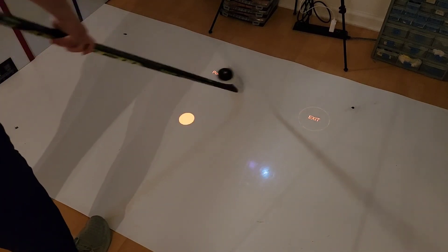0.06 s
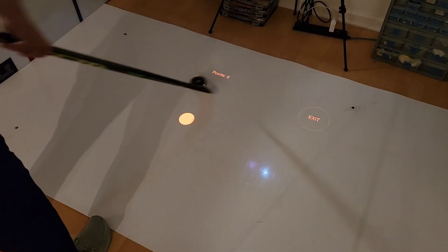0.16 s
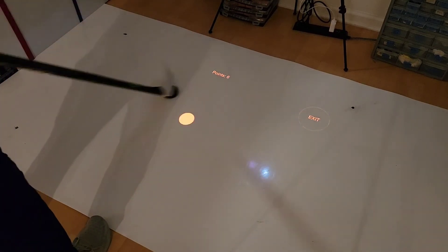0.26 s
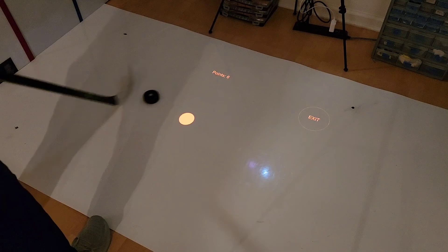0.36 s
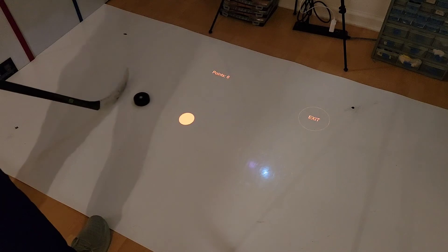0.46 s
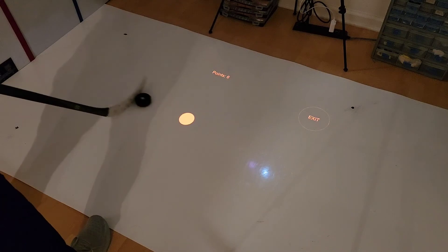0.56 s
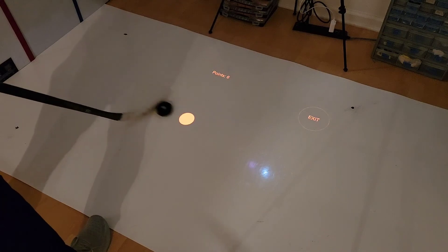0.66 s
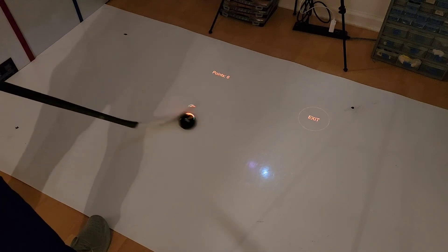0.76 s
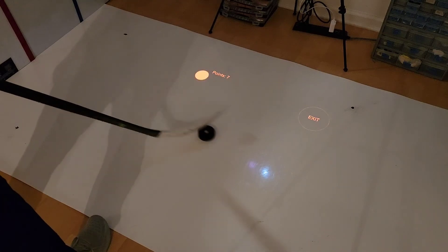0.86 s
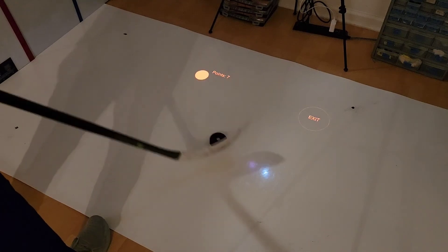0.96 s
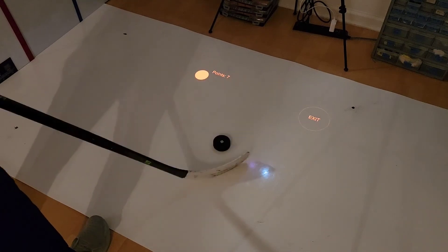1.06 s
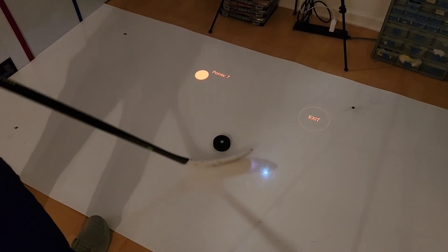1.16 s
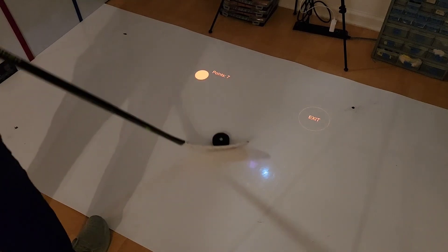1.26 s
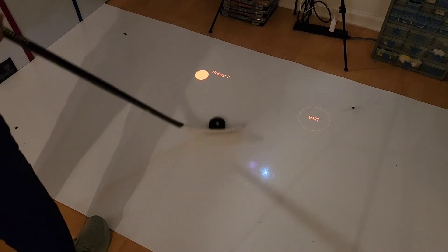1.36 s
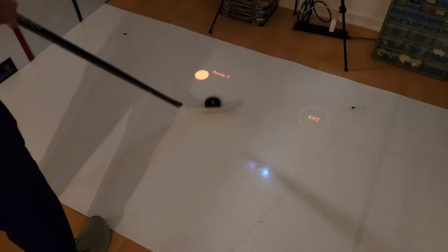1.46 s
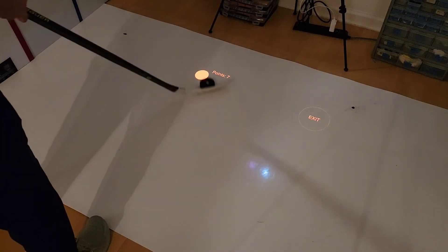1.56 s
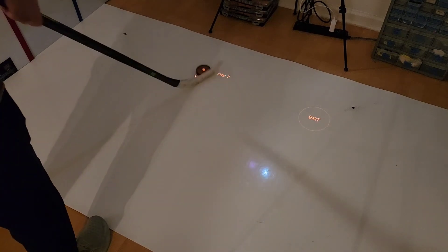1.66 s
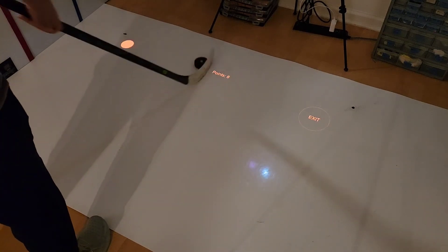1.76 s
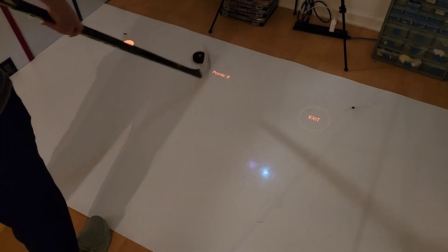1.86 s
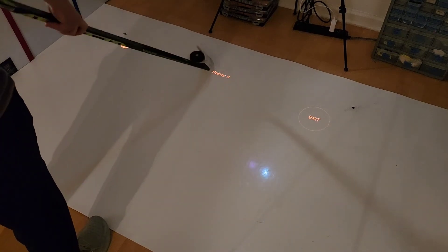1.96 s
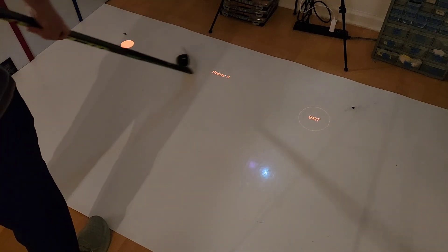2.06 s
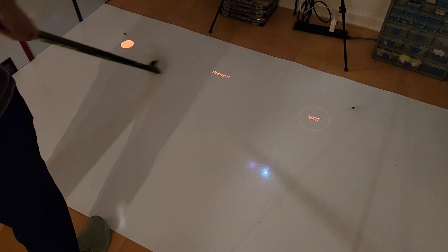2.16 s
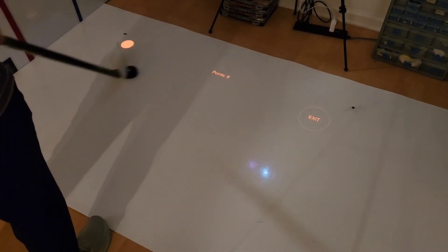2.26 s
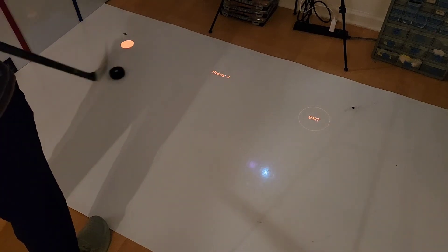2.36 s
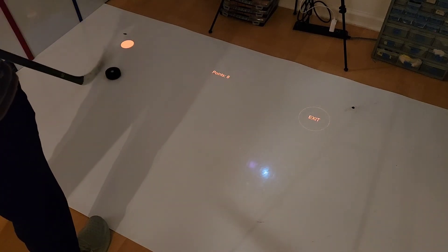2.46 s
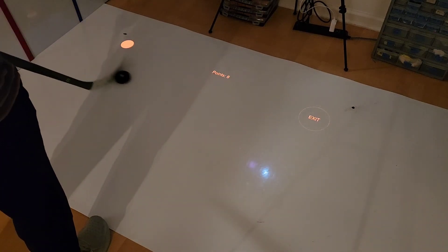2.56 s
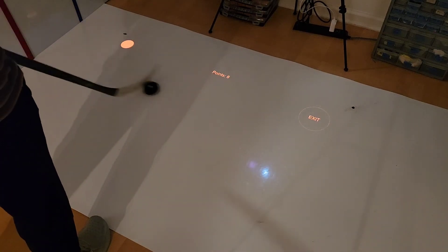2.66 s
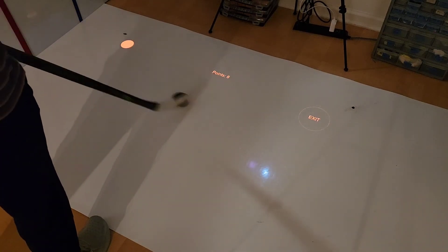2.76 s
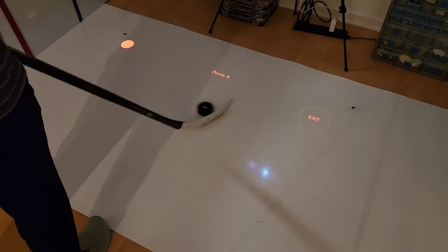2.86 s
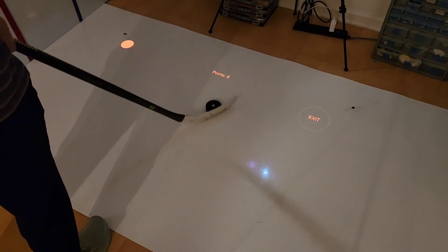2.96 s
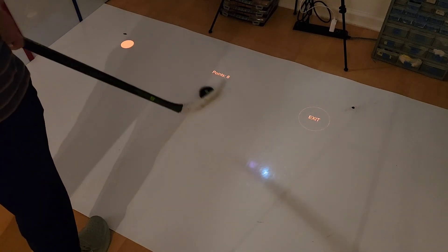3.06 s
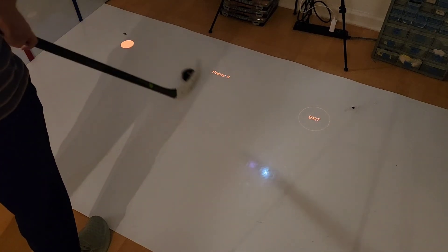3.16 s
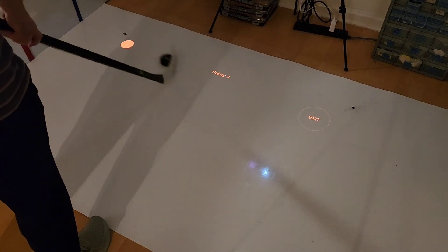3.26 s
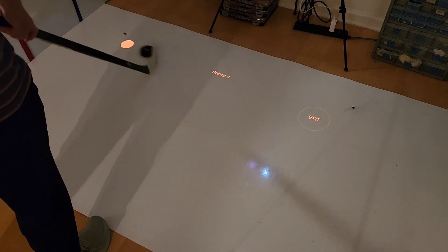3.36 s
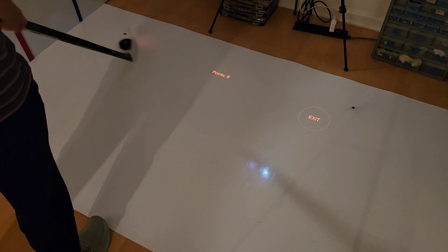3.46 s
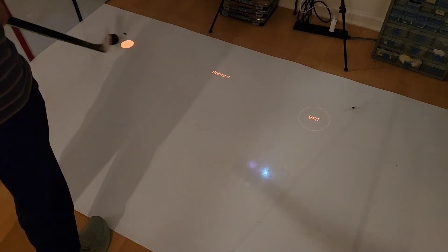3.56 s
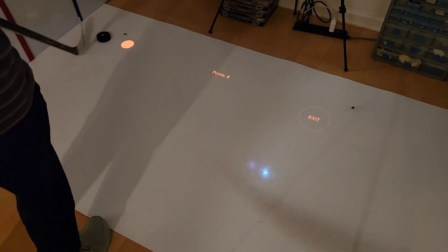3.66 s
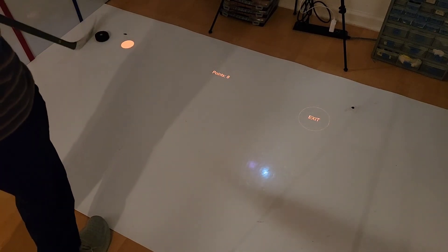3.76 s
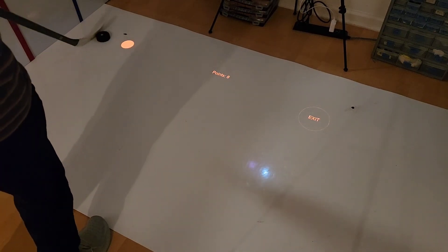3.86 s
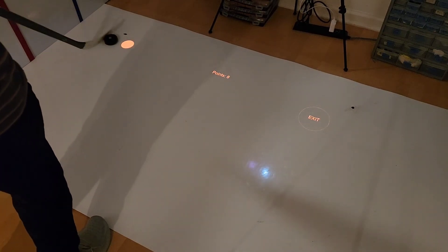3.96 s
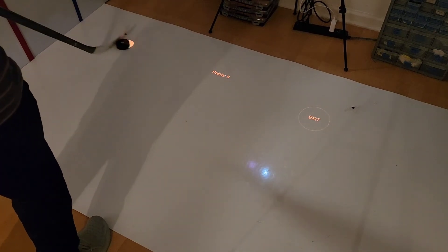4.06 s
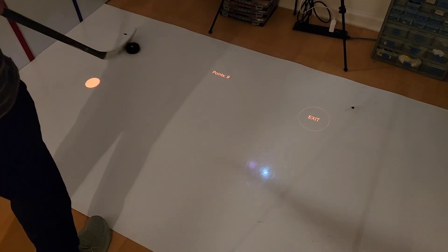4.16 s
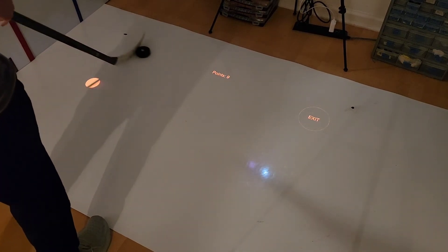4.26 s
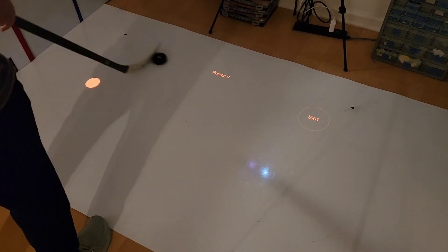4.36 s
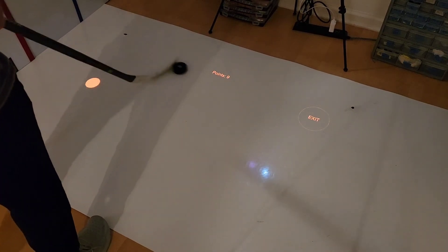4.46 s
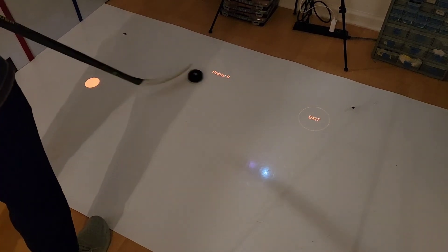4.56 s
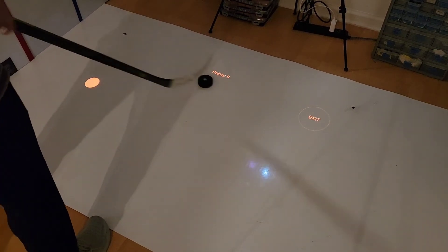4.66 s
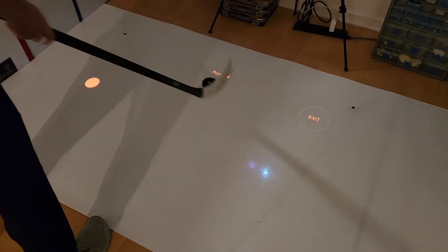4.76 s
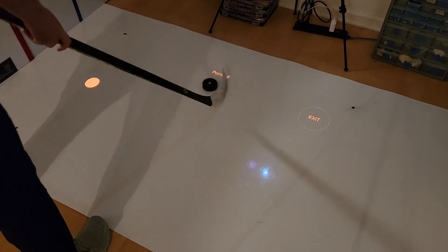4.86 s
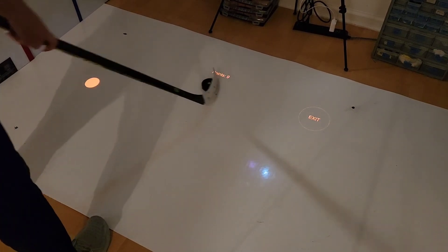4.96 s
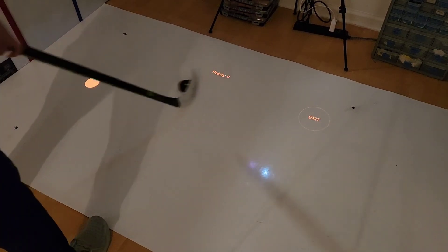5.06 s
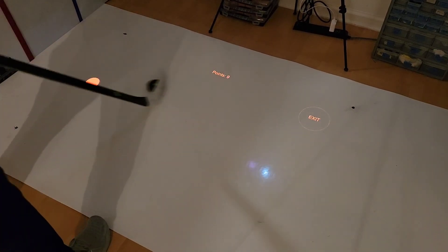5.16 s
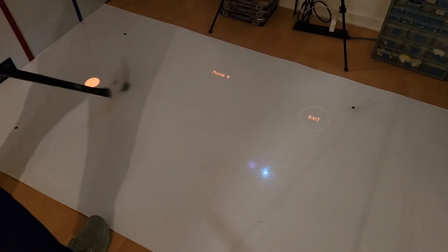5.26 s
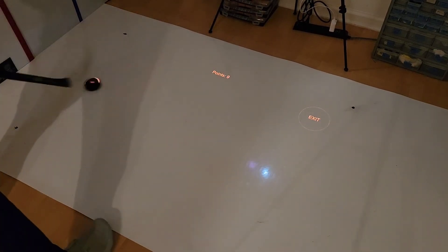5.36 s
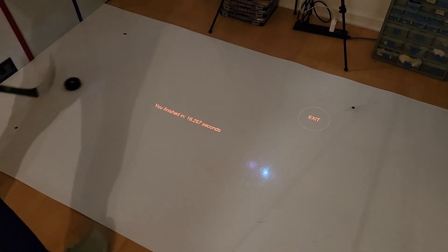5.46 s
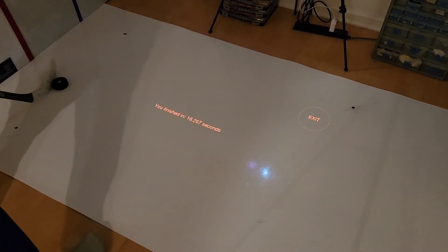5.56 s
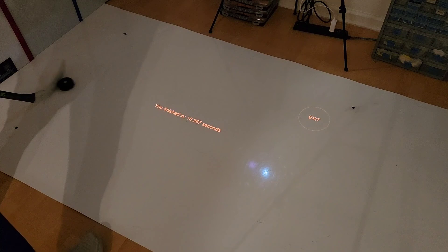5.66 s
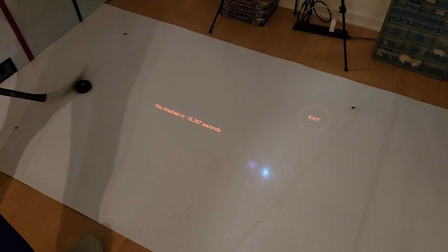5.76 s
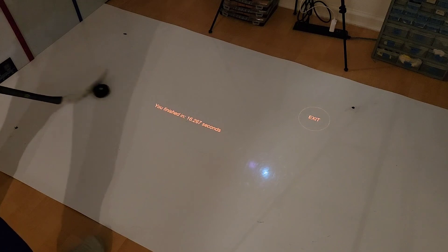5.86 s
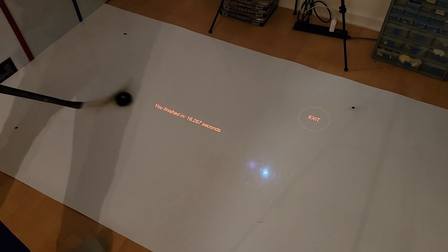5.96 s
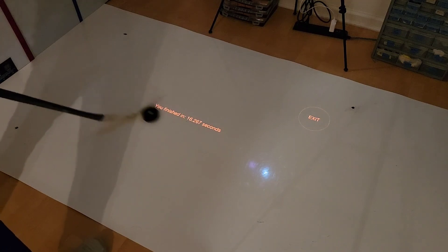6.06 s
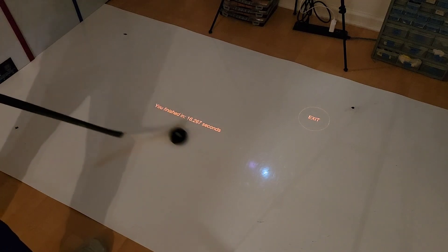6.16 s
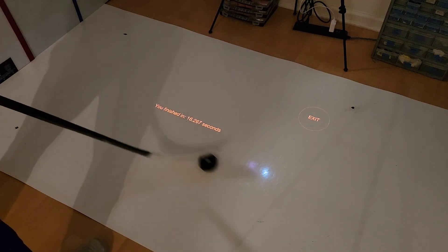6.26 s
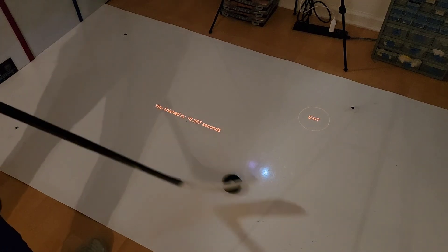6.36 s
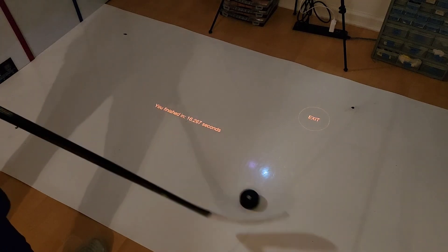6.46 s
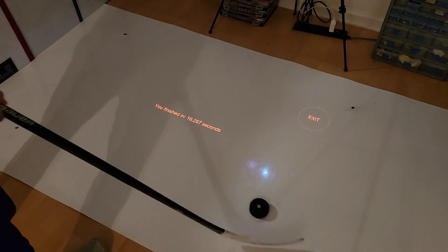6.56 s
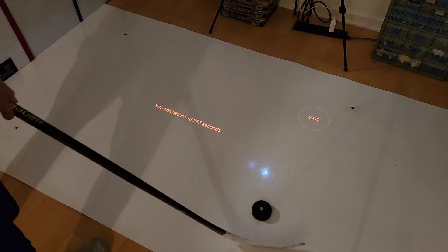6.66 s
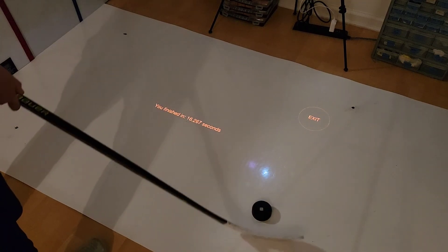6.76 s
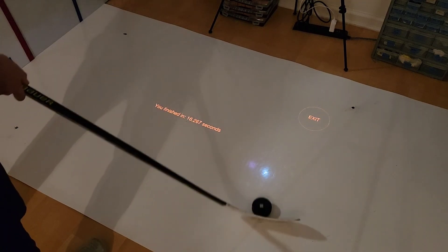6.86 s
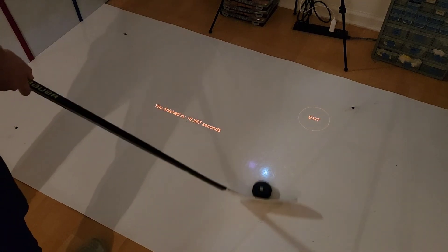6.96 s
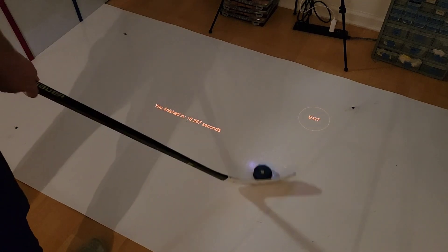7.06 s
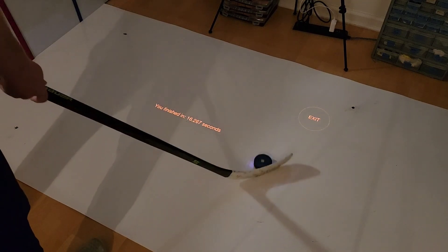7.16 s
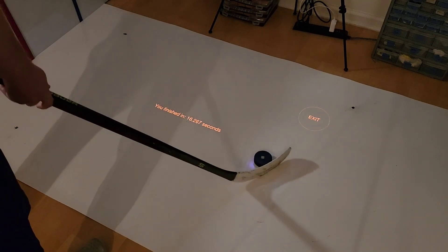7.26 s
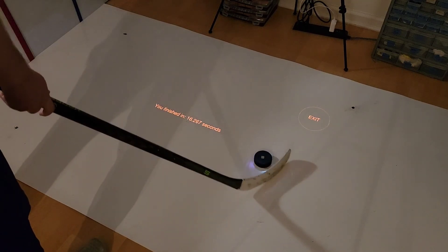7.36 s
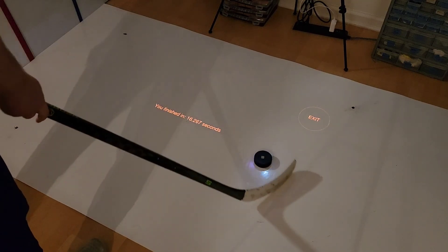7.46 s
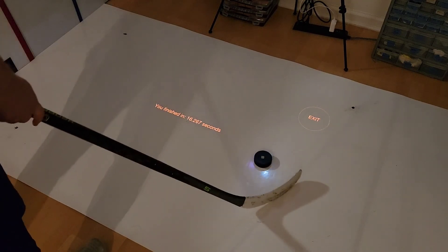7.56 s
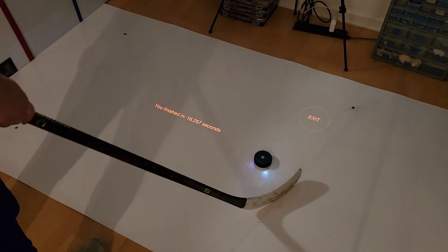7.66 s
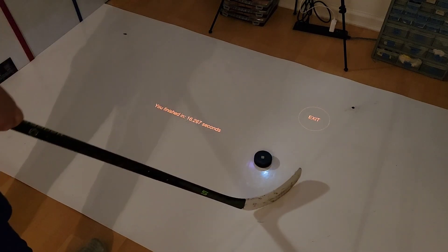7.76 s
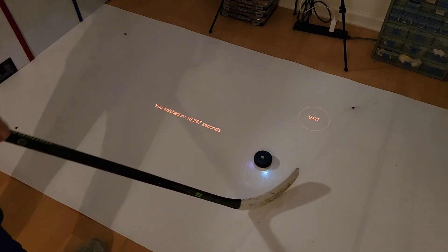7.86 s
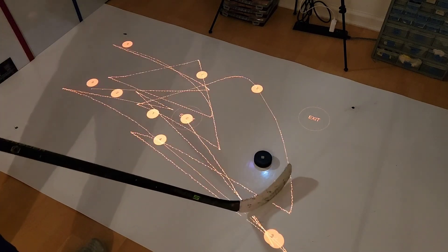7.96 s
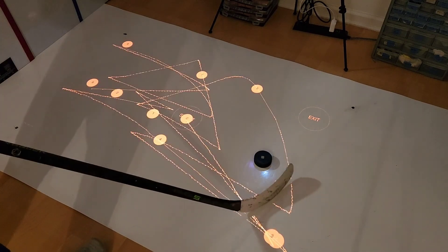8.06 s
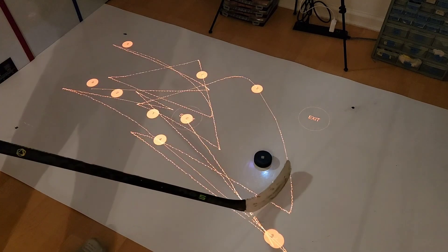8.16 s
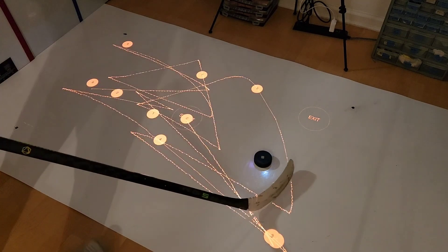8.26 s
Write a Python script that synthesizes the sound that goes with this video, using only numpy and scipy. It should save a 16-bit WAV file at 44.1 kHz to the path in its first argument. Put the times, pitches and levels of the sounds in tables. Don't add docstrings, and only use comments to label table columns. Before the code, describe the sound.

Stickhandling practice in a bare room: irregular woody clacks of stick on ball, faint scrapes, dull board thumps, and low ventilation rumble.

```python
import sys
import numpy as np
from scipy import signal
from scipy.fft import rfft, irfft
from scipy.io import wavfile

SR = 44100
rng = np.random.default_rng(int(sys.argv[2]) if len(sys.argv) > 2 else 0)


def field_ratio(decibels):
    return 10 ** (np.asarray(decibels, dtype=float) / 20)


def to_wav(sig):
    pcm = np.clip(np.atleast_2d(sig), -1, 1) * 32767
    pcm = np.round(pcm).astype(np.int16)
    wavfile.write(sys.argv[1], SR, pcm.T)


N = 366912
EDGES = 20 * 2 ** np.arange(0, 9.9, 1 / 3)
TAIL = 24000
COARSE = np.arange(0, N + 40, 40)


def at_hz(points, hz):
    table_hz, table_db = np.array(points).T
    return np.interp(np.log(hz), np.log(table_hz), table_db)


def rms_one(x):
    return x / np.sqrt(np.mean(x ** 2) + 1e-20)


def add(out, s, sound):
    at = round(s * SR)
    out[:, at:at + sound.shape[1]] += sound[:, :N - at]


def drift(rate_hz):
    pole = np.exp(-80 * np.pi * rate_hz / SR)
    settle = 2000
    noise = rng.standard_normal(len(COARSE) + settle)
    return rms_one(signal.lfilter([1], [1, -2 * pole, pole * pole], noise)[settle:])


def gestures(start_s, end_s, level_db, rest_db, rise_db_s, fall_db_s):
    t = COARSE[:, None] / SR
    rise_db = rise_db_s * np.maximum(start_s - t, 0)
    fall_db = fall_db_s * np.maximum(t - end_s, 0)
    power = field_ratio(2 * rest_db) + np.sum(field_ratio(2 * (level_db - rise_db - fall_db)), axis=1)
    return 10 * np.log10(power)


def diffuse_bands():
    # (frequency [Hz], left-right likeness [-1 to 1])
    likeness = [(60, 0.98), (130, 0.92), (290, 0.89), (640, 0.4), (1410, 0.32), (3100, 0.14), (6820, -0.13),
                (15000, 0.11)]
    hz = np.maximum(np.arange(N // 2 + 1) * SR / N, 1)
    alike = np.clip(at_hz(likeness, hz), 0, 1)
    mid, side = rfft(rng.standard_normal((2, N)))
    pair = np.sqrt(1 + alike) * mid + np.sqrt(1 - alike) * side * np.array([[1], [-1]])
    place = np.log(hz / EDGES[0]) / np.log(EDGES[1] / EDGES[0])
    bands = []
    for k in range(len(EDGES)):
        window = np.cos(np.pi / 2 * np.clip(place - k, -1, 1))
        bands.append(irfft(pair * window, N))
    return np.array(bands)


def coloured(bands, spectrum, level_db, patchy_db):
    out, plain_power = np.zeros((2, N)), 0
    for hz, band in zip(EDGES, bands):
        if spectrum[0][0] <= hz <= spectrum[-1][0]:
            band_db = at_hz(spectrum, hz)
            gain_db = level_db + band_db + patchy_db * drift(7.3)
            out += np.interp(np.arange(N), COARSE, field_ratio(gain_db)) * band
            plain_power += field_ratio(2 * band_db) * np.var(band[0, ::7])
    return out / np.sqrt(plain_power)


def ring(modes, gains_db, length):
    t = np.arange(length) / SR
    hz, mode_db, t60_s = np.transpose(modes)[:, :, None]
    signs = (-1.) ** np.arange(len(modes))[:, None]
    envelope = field_ratio(mode_db + gains_db[:, None] - 60 * t / t60_s)
    return np.sum(signs * envelope * np.sin(2 * np.pi * hz * t), axis=0)


def room_decay():
    # (frequency [Hz], T60 [s])
    room_t60 = [(60, 1), (160, 0.55), (420, 0.37), (1100, 0.56), (2900, 0.66), (7700, 0.53), (14000, 0.74)]
    # (frequency [Hz], level [dB])
    room_colour = [(60, 3), (250, 3), (700, 2.5), (1500, -2.5), (3000, -1.5), (6000, 1), (12000, 2)]
    gap_s, early_s = 0.0026, 0.07
    t = np.arange(TAIL) / SR
    dying = field_ratio(at_hz(room_colour, EDGES)[:, None] - 60 * t / at_hz(room_t60, EDGES)[:, None])
    onset = np.clip(t / gap_s - .3, 0, 1)
    return dying * onset * (1 + 1.1 * np.exp(-t / early_s))


def heard(bands, decay, sound, wet_db):
    # (delay [s], level [dB])
    echoes = [(.0045, -11), (.0085, -12), (.0115, -9), (.017, -13), (.024, -13)]
    start = rng.integers(0, N - TAIL)
    grain = bands[:, :, start:start + TAIL]
    room = field_ratio(wet_db - 41) * np.einsum("bct,bt->ct", grain, decay)
    for (delay_s, echo_db), (shift, side) in zip(echoes, rng.normal(0, 1, (len(echoes), 2))):
        at = round((delay_s + .0008 * shift) * SR)
        room[[0, 1], [at, at + round(9 * side)]] += field_ratio(echo_db + wet_db)
    room[[0, 1], [0, 3]] += 1
    return signal.fftconvolve(room, sound[None], axes=1)


def rumble(bands):
    # (frequency [Hz], density [dB per Hz])
    rumble_colour = [(12, -40), (20, 6.5), (33, -13), (53, 12.5), (76, 3.5), (129, -11), (145, -56.5),
                     (160, -57), (210, -89), (350, -120)]
    # (start [s], end [s])
    swells = [(0.0, .5), (1.3, 1.42), (2.35, 2.6), (6.3, 7.5), (7.75, 7.85), (8.25, 8.32)]
    swell_db = [-52.5, -57.5, -52.5, -57.5, -64.5, -51]
    level_db = gestures(*np.transpose(swells), np.array(swell_db), rest_db=-57, rise_db_s=40, fall_db_s=30)
    return coloured(bands, rumble_colour, level_db, patchy_db=3.5)


def room_tone(bands):
    # (frequency [Hz], density [dB per Hz])
    air = [(100, -1), (130, -5.5), (400, -7.5), (800, -14), (1800, -24), (4000, -36), (6500, -51),
           (16500, -50)]
    return coloured(bands, air, level_db=-58, patchy_db=2.66)


def sliding(bands):
    # (start [s], end [s])
    strokes = [(0.1, .22), (.25, .85), (1.14, 1.78), (2.09, 2.39), (2.46, 3.46), (3.52, 3.8), (4.0, 4.12),
               (4.15, 4.4), (4.42, 4.58), (4.95, 5.5), (5.58, 6.2), (6.22, 6.52), (6.9, 7.22), (7.36, 7.6)]
    # (fizz level [dB], scrape level [dB])
    stroke_db = [(-63.5, -71), (-70, -71.5), (-66.5, -65), (-64.5, -63.5), (-64, -66), (-73.5, -75),
                 (-68, -62), (-68.5, -68), (-63, -62.5), (-65, -70), (-64.5, -71), (-68.5, -68),
                 (-69, -67.5), (-68.5, -65)]
    # (frequency [Hz], density [dB per Hz])
    scrape = [(800, -1.5), (1300, -13), (2000, -13), (3000, -1.9), (4500, 0), (6000, -2.5), (8000, -3.5)]
    # (frequency [Hz], density [dB per Hz])
    fizz = [(5000, -36), (6500, -12), (8000, 5), (10000, -5), (12500, -7), (14500, -4), (16500, -9)]
    start_s, end_s = np.transpose(strokes)
    stroke_fizz_db, stroke_scrape_db = np.transpose(stroke_db)
    fizz_db = gestures(start_s, end_s, stroke_fizz_db, rest_db=-81.5, rise_db_s=300, fall_db_s=110)
    scrape_db = gestures(start_s, end_s, stroke_scrape_db, rest_db=-76, rise_db_s=300, fall_db_s=110)
    return coloured(bands, scrape, scrape_db, patchy_db=2.5) + coloured(bands, fizz, fizz_db, patchy_db=3.9)


def knocks(bands, decay):
    # (time [s], direct body rms [dB]; upper body [dB], crack [dB]
    # relative to body; room share [dB])
    hits = [(0.456, -25, 3.5, -15.5, 5.5), (0.609, -21, -4, -11.5, 1.5), (1.131, -22.5, -4, -18, -1),
            (1.311, -24.5, -6, -19.5, 4), (2.337, -39.5, -10, -23, 4.5), (2.443, -39, -18, -20, 2.5),
            (2.469, -27, -9, -26, 6.5), (2.574, -21, -10, -24, 2.3), (2.923, -22, -4, -16, 2),
            (2.966, -24, 0, -8.5, 2.1), (3.741, -24.5, -3, -16, 6), (4.934, -20, 3.1, -4, 1.5),
            (5.565, -28.5, -10.5, -20.5, 6), (5.63, -26, -10.5, -19.5, 1.6), (6.721, -42, 5, -43, -3),
            (6.906, -28, -3.5, -19.5, 3.5), (2.517, -36, -11, -24, 2.5), (2.655, -40.5, -8, -27, -2),
            (3.895, -44, -19, -23, 2), (5.034, -32, -6.5, -19, 2)]
    # (frequency [Hz], level [dB], T60 [s])
    blade_modes = [
        [(150.4, 0, 0.012), (214, 3, 0.032), (307, 0.5, 0.026), (414, -10, 0.081)],
        [(508, 4, 0.012), (683, 2, 0.02), (805, 3, 0.0095), (1003, -3, 0.011)],
        [(1080, -2, 0.00678), (1386, -2.5, 0.0065), (1613, -2, 0.0048), (2180, 0, 0.0013)],
        [(2514, -0.5, 0.0026), (2800, 0.5, 0.0028), (3260, -5.5, 0.0027), (4065, -13, 0.0043),
         (4700, -3, 0.00088), (5400, -23.5, 0.0061)],
        [(6600, -3.5, 0.00149), (7800, -4, 0.003), (8180, -3.5, 0.0014), (11400, -12.5, 0.0014),
         (13500, -13, 0.00047)],
    ]
    peak_s = 0.0016
    out, t = np.zeros((2, N)), np.arange(2000) / SR
    for s, body_db, upper_db, crack_db, wet_db in hits:
        low_db = -9.0 - 0.19 * upper_db
        edge_db = 0.86 * crack_db - 11.5
        families_db = [low_db, -1.5, upper_db + 0.5, crack_db + 5.5, edge_db]
        blade = 0
        for modes, family_db in zip(blade_modes, families_db):
            rise = 1 - np.exp(-t * modes[0][0] / 0.44)
            family = rise * ring(modes, rng.normal(0, 1.2, len(modes)), len(t))
            top = np.abs(family).argmax()
            family *= -np.sign(family[top])
            wait = max(round(peak_s * SR) - top, 0)
            family_rms = np.sqrt(np.sum(family ** 2) / 330)
            blade = blade + field_ratio(body_db + family_db) * np.roll(family, wait) / family_rms
        add(out, s - .0009, heard(bands, decay, blade, wet_db))
    return out


def shaft(bands, decay):
    # (time [s], frequency [Hz], peak level [dB], T60 [s])
    shaft_notes = [(.456, 697, -26, 0.051), (.456, 4700, -41, 0.011), (.609, 458, -35, 0.054),
                   (.609, 5440, -29, 0.0027), (1.131, 400, -30.5, 0.036), (3.743, 630, -31.5, 0.056),
                   (4.934, 630, -27, 0.045), (5.63, 407, -34, 0.038), (6.721, 1070, -65, 0.15),
                   (6.907, 793, -32, 0.059), (.456, 2700, -24, 0.007), (3.743, 384, -34, 0.037)]
    out = np.zeros((2, N))
    for s, hz, peak_db, t60_s in shaft_notes:
        note = ring([(hz, peak_db, t60_s)], np.zeros(1), 9000)
        add(out, s, heard(bands, decay, note, wet_db=13.5))
    return out


def thumps():
    # (time [s], peak level [dB])
    steps = [(0.468, -30.5), (0.611, -39), (1.125, -42), (1.304, -49), (1.645, -53), (2.348, -25),
             (2.485, -33), (2.577, -37), (2.936, -35), (3.311, -46), (3.475, -43), (3.752, -26.5),
             (4.937, -44), (5.097, -43), (5.299, -35), (5.563, -35), (6.183, -47), (6.904, -44),
             (7.846, -61.5)]
    # (frequency [Hz], level [dB], T60 [s])
    floorboard = [(50, -20, 0.1), (94.1, 1, 0.26), (120, -26, .12)]
    out, length = np.zeros((2, N)), 12000
    rise = 1 - np.exp(-np.arange(length) / SR / 0.014)
    for s, peak_db in steps:
        boom = ring(floorboard, peak_db + 3.5 + rng.normal(0, 3.0, 3), length)
        add(out, s - .006, boom * rise * field_ratio([[.7], [-.7]]))
    return out


def scuffs(bands, decay):
    # (time [s], peak level [dB], centre [Hz], width [Hz], decay length [s])
    rubs = [(0.842, -58, 6340, 490, 0.022), (1.724, -53, 3140, 940, 0.029), (1.821, -52, 1700, 1640, 0.028),
            (2.19, -42.5, 7000, 5400, 0.017), (2.206, -44, 515, 372, 0.017),
            (2.247, -40.5, 5140, 920, 0.019), (2.613, -39.5, 4330, 940, 0.0083),
            (2.702, -48, 8240, 1500, 0.017), (3.411, -41.5, 4020, 980, 0.011),
            (3.507, -45, 3970, 2640, 0.014), (3.985, -60.5, 8500, 7000, 0.053),
            (4.454, -56.5, 8600, 1240, 0.039), (5.092, -44.5, 310, 256, 0.046),
            (5.277, -48, 209, 153, 0.024), (6.208, -50, 670, 300, 0.016), (5.349, -39, 6130, 2480, 0.004),
            (5.432, -54, 4570, 2500, 0.0067), (5.753, -44.5, 3870, 2980, 0.0083),
            (5.883, -31, 6060, 7000, 0.0014), (6.218, -45, 6850, 9500, 0.025),
            (6.26, -58, 7800, 1500, 0.029), (7.376, -62, 2700, 1110, 0.21)]
    out, t = np.zeros((2, N)), np.arange(6000) / SR
    for s, peak_db, hz, width_hz, length_s in rubs:
        r = np.exp(-np.pi * width_hz / SR)
        resonance = [1, -2 * r * np.cos(2 * np.pi * hz / SR), r * r]
        rub = rng.standard_normal(len(t))
        for stage in range(2):
            rub = signal.lfilter([1, 0, -1], resonance, rub)
        shape = (1 - np.exp(-t / 0.00097)) * np.exp(-t / length_s)
        add(out, s, heard(bands, decay, field_ratio(peak_db) * rms_one(rub) * shape, wet_db=0.5))
    return out


def scene():
    bands, decay = diffuse_bands(), room_decay()
    noise = rumble(bands) + room_tone(bands) + sliding(bands)
    play = knocks(bands, decay) + shaft(bands, decay) + scuffs(bands, decay)
    return play * field_ratio([[1.5], [-1.5]]) + thumps() + noise * field_ratio([[.9], [-.9]])


def top_cut(x):
    return signal.sosfilt(signal.butter(12, 16490, fs=SR, output="sos"), x)


def record(dry):
    # (centre [Hz], width [Hz], depth [0-1])
    port_notch = (9900, 1500, .62)
    hz, width_hz, depth = port_notch
    port_band = signal.lfilter(*signal.iirpeak(hz, hz / width_hz, fs=SR), dry)
    rounded = np.tanh((dry - depth * port_band) / 1.05) * 1.05
    low_pass = signal.cheby2(12, 50, 16300, fs=SR, output="sos")
    return top_cut(signal.sosfilt(low_pass, rounded))


dry = scene()
out = record(dry)
to_wav(out)
```